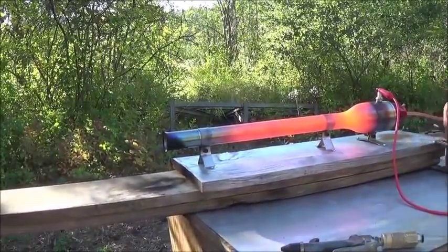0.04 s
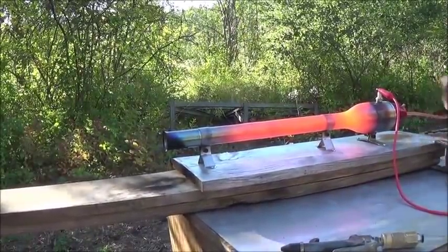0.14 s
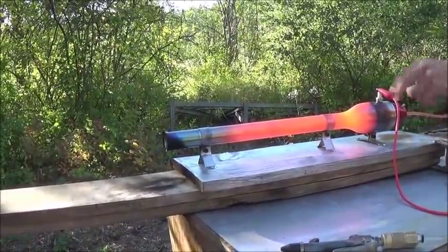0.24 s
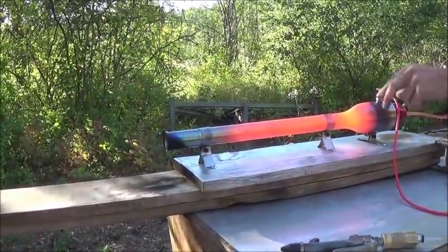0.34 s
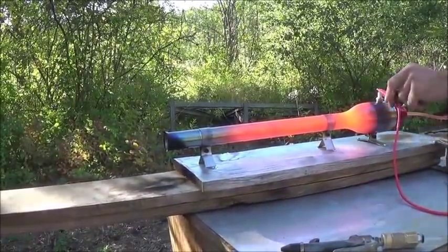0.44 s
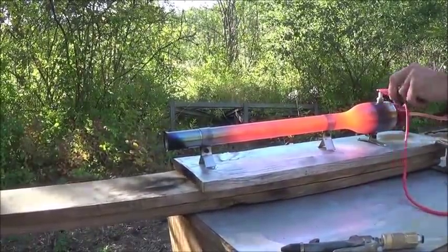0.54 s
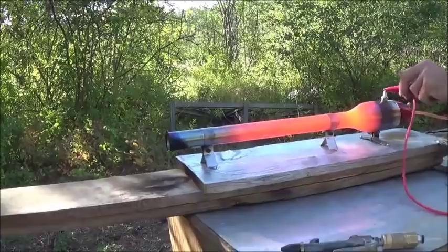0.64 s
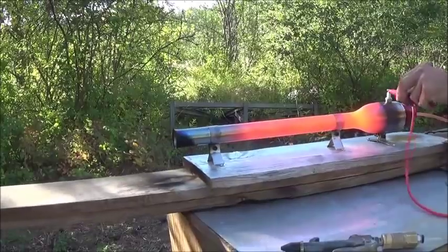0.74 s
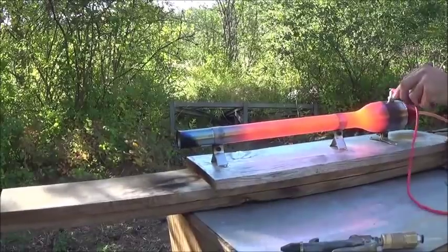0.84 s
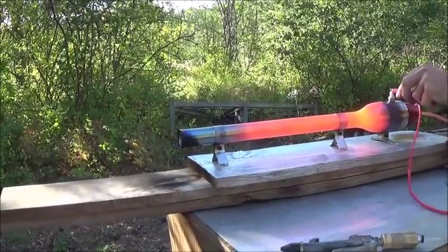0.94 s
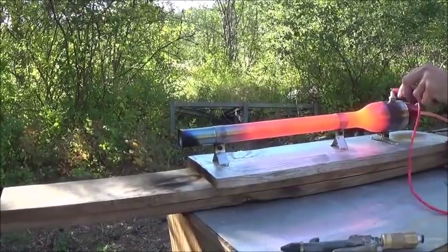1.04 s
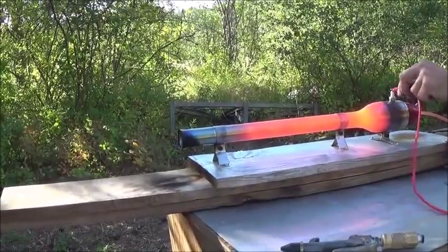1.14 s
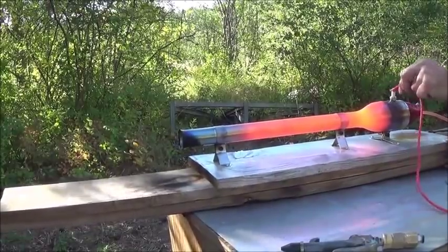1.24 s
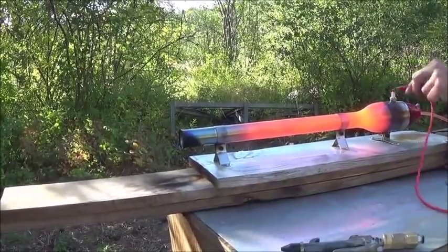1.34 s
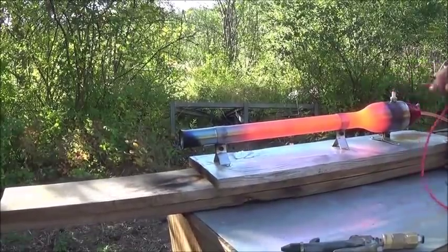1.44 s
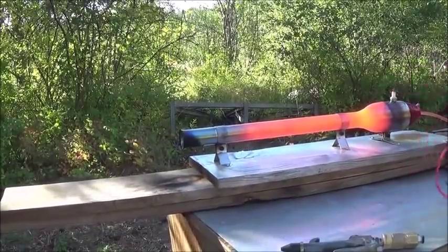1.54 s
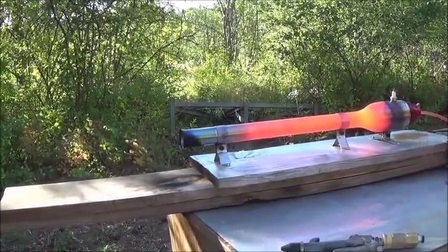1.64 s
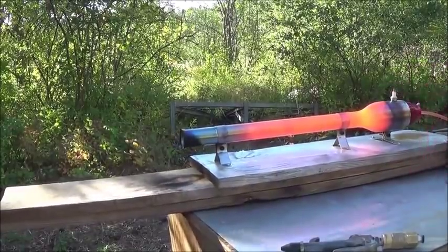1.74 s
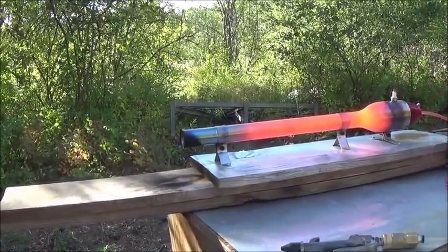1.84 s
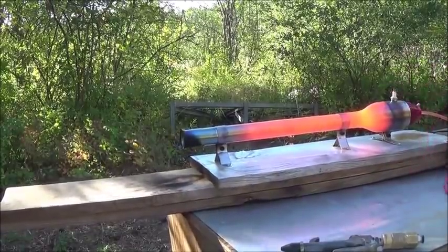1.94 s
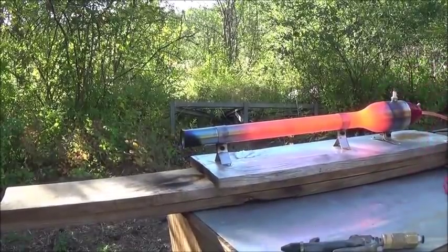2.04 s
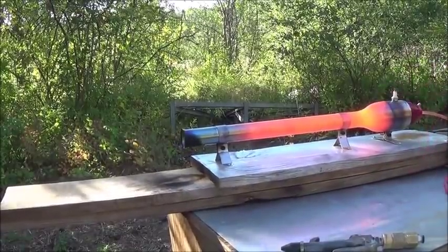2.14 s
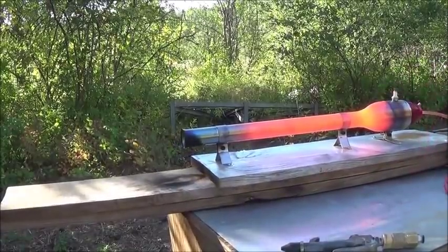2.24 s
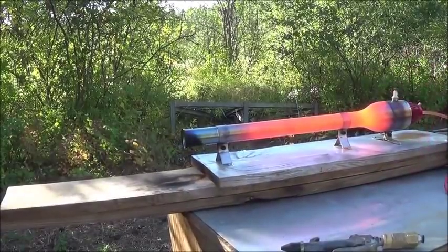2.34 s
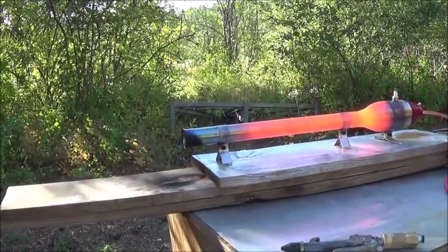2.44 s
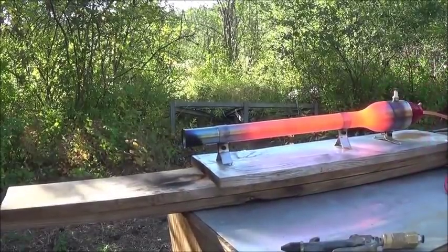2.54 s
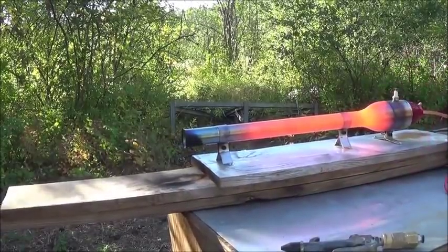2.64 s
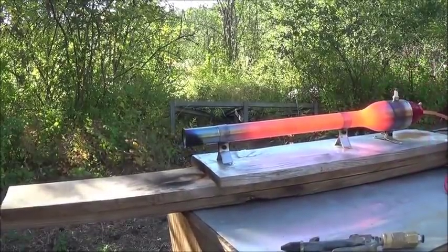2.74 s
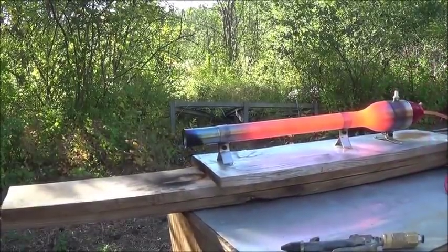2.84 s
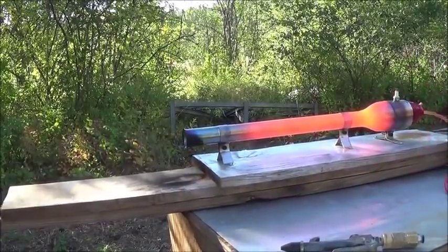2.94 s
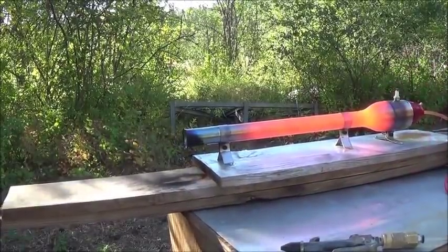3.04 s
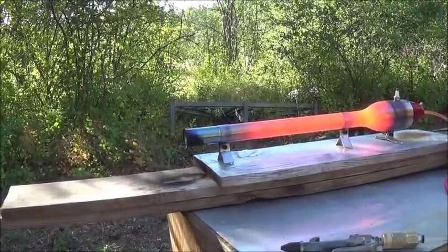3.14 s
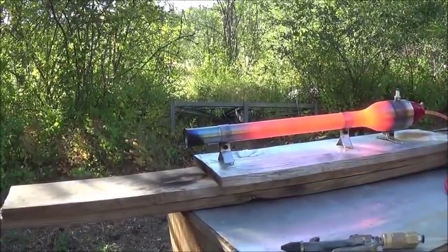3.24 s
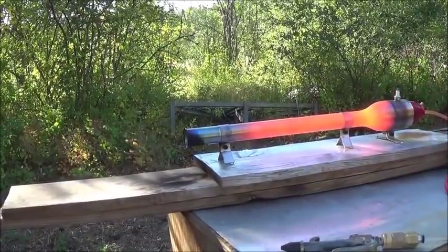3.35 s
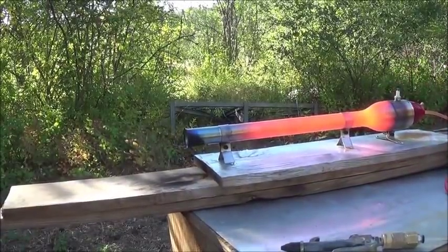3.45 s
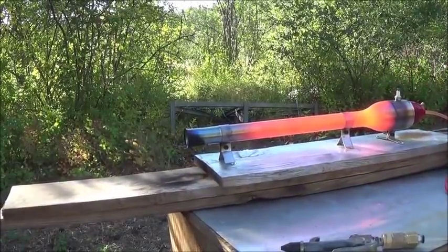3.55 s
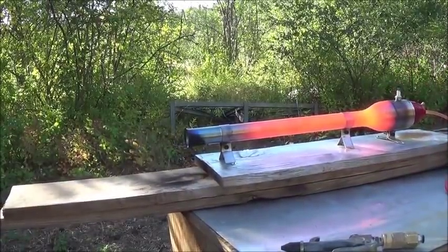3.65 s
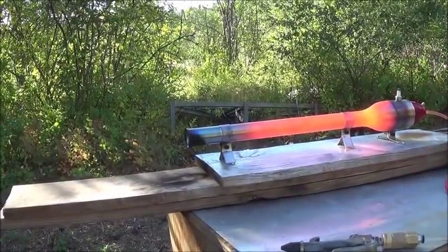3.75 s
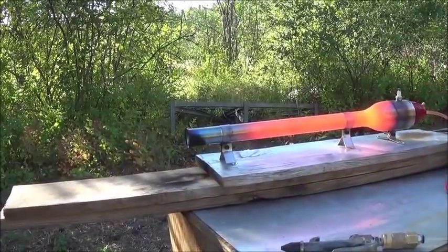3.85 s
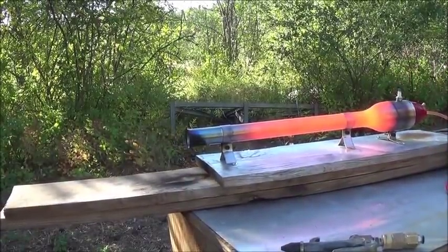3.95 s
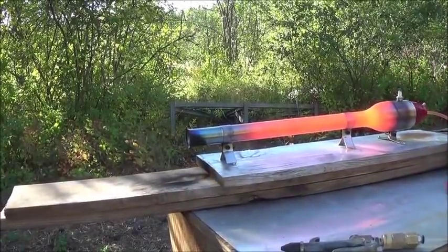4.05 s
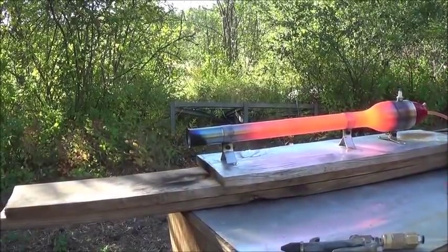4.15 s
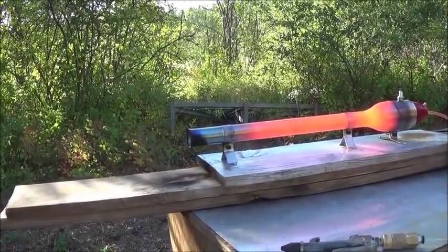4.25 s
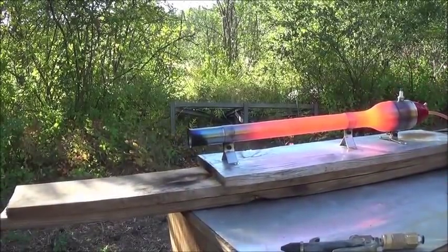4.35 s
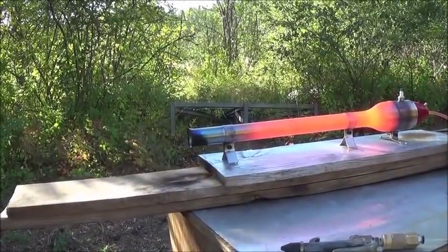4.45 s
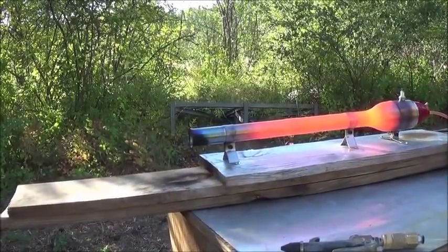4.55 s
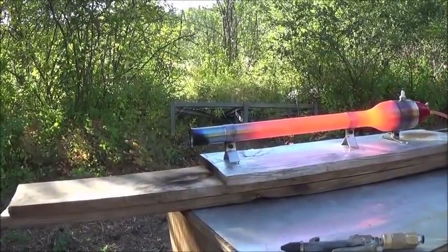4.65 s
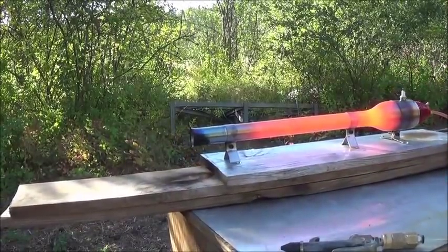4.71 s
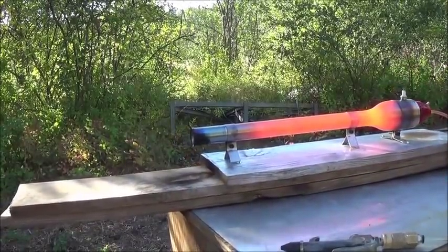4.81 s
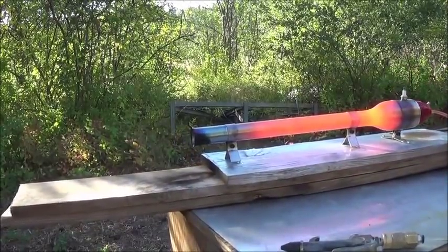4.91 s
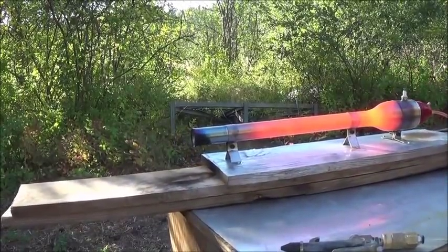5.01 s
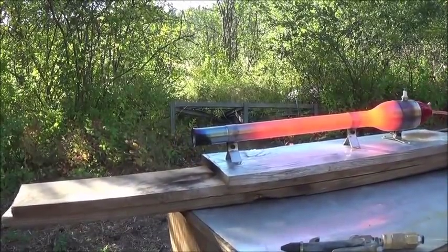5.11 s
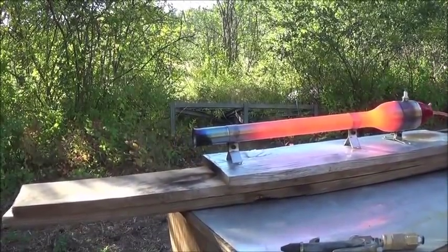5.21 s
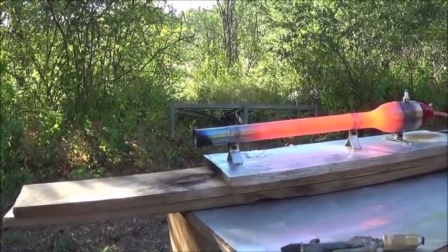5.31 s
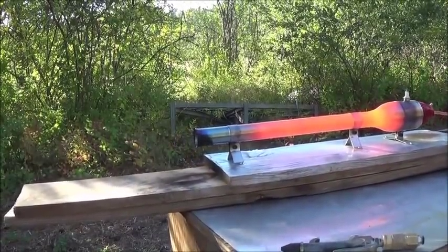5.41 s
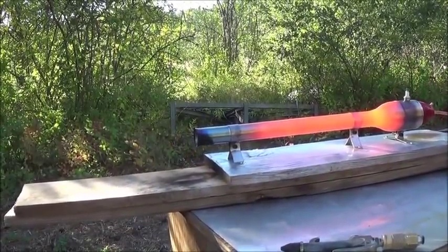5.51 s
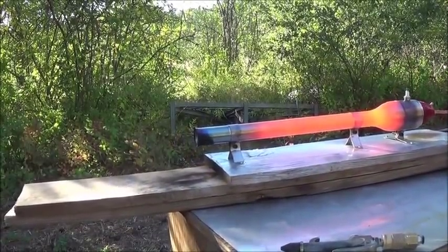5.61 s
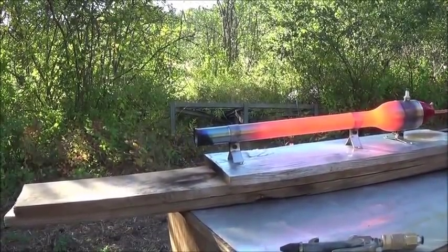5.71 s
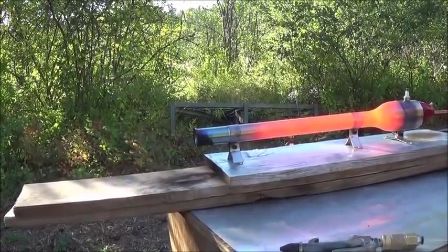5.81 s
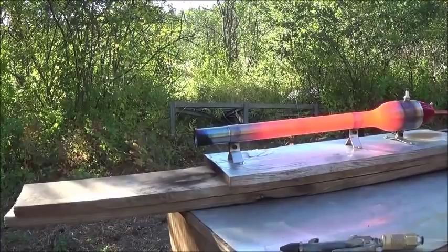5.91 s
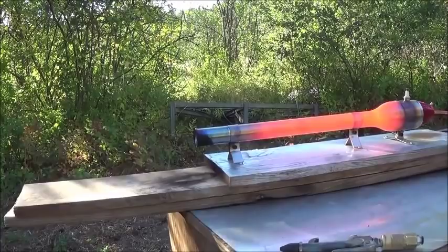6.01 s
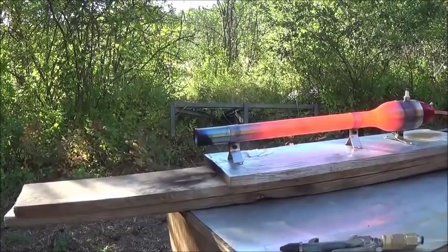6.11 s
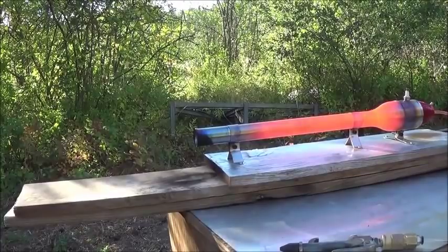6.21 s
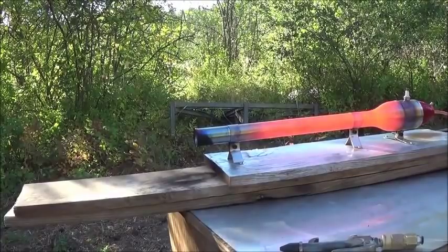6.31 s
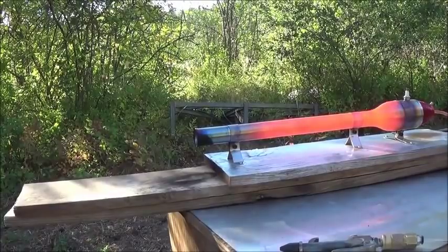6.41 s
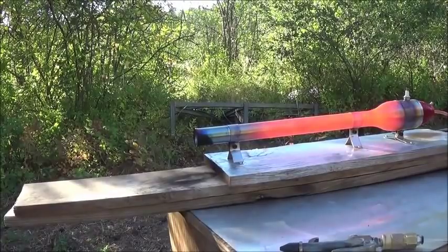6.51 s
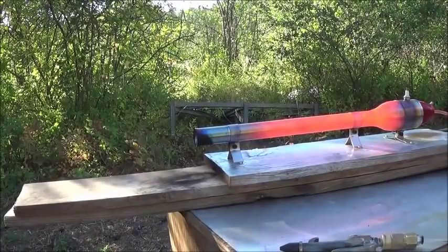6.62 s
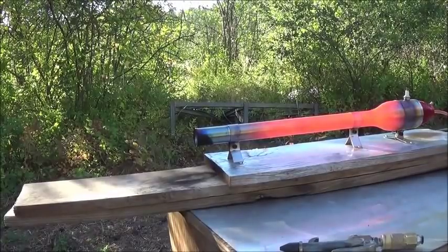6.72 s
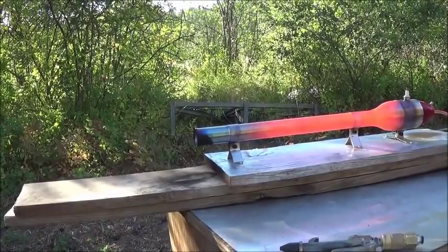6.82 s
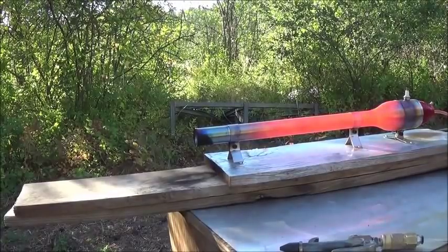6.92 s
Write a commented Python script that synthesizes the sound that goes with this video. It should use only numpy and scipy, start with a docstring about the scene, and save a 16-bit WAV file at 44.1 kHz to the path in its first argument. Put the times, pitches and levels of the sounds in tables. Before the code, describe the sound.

Continuous harsh buzzing roar from a pulse jet, close to a stereo camera microphone in a leafy outdoor spot. The level is squashed and slightly saturated, the tone unsteady and grainy, with wide turbulent gas noise. At about 5.7 seconds the flame goes out abruptly with a dull pop and a short diffuse echo. What remains is a faint, fast knocking pump, slightly right, over soft air hiss, both growing gradually louder.

```python
"""A loud, buzzing roar flames out after about 5.7 s; then a quiet electric pump and outdoor hiss rise into hearing.
The roar is a small pulse jet on a bench outdoors: each firing gives a pressure pulse and bursts of turbulent gas.
The pulse is a sum of wavering tones, the gas is puffed noise, and trees return a short echo made of fading noise.
The pump is a train of knocks and a rattle ringing its casing; the air is soft noise.
A gain control turns the loud jet down and recovers slowly once it has stopped."""
import sys
import numpy as np
from scipy import signal
from scipy.fft import rfft, irfft, next_fast_len
from scipy.io import wavfile
from scipy.ndimage import uniform_filter1d

SR = 44100
rng = np.random.default_rng(int(sys.argv[2]) if len(sys.argv) > 2 else 0)


def file_out(sig):
    """Save sig as 16-bit WAV at sys.argv[1]."""
    # one column per channel
    cols = np.atleast_2d(sig).T
    # limit, then scale
    lim = np.clip(cols, -1, 1)
    pcm = np.round(lim * 32767).astype(np.int16)
    wavfile.write(sys.argv[1], SR, pcm)


N = 307377
T = np.arange(N) / SR  # time in seconds
SIZE = next_fast_len(N + SR)  # a second of spare room, so that filtered sound does not wrap around
HZ = np.maximum(np.fft.rfftfreq(SIZE, 1 / SR), 1)  # frequency of each spectrum bin

# How alike left and right are for the jet's gas and the echo.
# Each row: frequency in Hz, shared part from 0 to 1.
LIKENESS = [(60, .6), (130, .35), (330, .12), (1000, .15), (1500, .65), (2500, .85), (4000, .87),
            (5000, .97), (8000, .996), (13000, .999)]


def undb(db):
    """Turn decibels into a gain."""
    return 10 ** (np.asarray(db) / 20)


def level(x, db):
    """Scale a sound to a chosen rms level in dB."""
    return x * undb(db) / np.sqrt(np.mean(x ** 2))


def over_hz(table, axis=1):
    """Read one column of a table at every frequency, joining the rows over log frequency."""
    rows = np.array(table, float)
    return np.interp(np.log(HZ), np.log(rows[:, 0]), rows[:, axis])


def walk(rate):
    """Random wandering with spread 1: each value is held for 1 / rate seconds, then smoothed twice."""
    hold = int(SR / rate)
    steps = np.repeat(rng.standard_normal(N // hold + 1), hold)
    x = uniform_filter1d(uniform_filter1d(steps, hold), hold)[:N]
    return x / x.std()


def spread(shared, own, alike):
    """Make left and right from two unrelated spectra: one is added to both, one has opposite signs."""
    mid = np.sqrt((1 + alike) / 2) * shared
    side = np.sqrt((1 - alike) / 2) * own
    return irfft(np.array([mid + side, mid - side]), SIZE)[:, :N]


def cycles():
    """Count firings through time: the rate climbs as the pipe heats, and combustion keeps it unsteady."""
    hot_hz, cold_gap_hz, warming_s = 254.5, 3.0, 1.4  # settled rate, shortfall at the start, time constant
    waver_hz = .9 * walk(50) + .25 * walk(4)
    rate_hz = hot_hz - cold_gap_hz * np.exp(-T / warming_s) + waver_hz
    return np.cumsum(rate_hz) / SR


def pulse(turns):
    """Tones near multiples of the firing rate start from a common suction spike; higher ones waver more."""
    # Tones of the pressure pulse. Each row: multiple of the firing rate, relative level in dB,
    # growth in dB per second.
    tones = [(0.9996, -0.5, 0), (1.998, -5, 0.8), (3, -5, 0), (4.014, -6, 0.69), (4.994, 1.5, 0.3),
             (5.98, -29, 0), (6.984, -5, -0.5), (8.03, -15, 0.2), (8.83, -19.5, 1), (10.01, -11, -0.5),
             (11, -14, 1), (12.07, -14, -0.5), (12.95, -9, -1.05), (14.3, -26, 3), (14.8, -18, 2),
             (15.8, -14, -1), (16.73, -21, -2.5), (18.23, -12, -1), (18.75, -15, 1), (21, -21.5, 0),
             (21.93, -14.5, 0), (22.85, -17, 0.5)]
    waver_db = .25  # for the first tone
    total = 0
    for multiple, db, growth in tones:
        tone_db = db + growth * T + waver_db * np.sqrt(multiple) * walk(60)
        total = total - undb(tone_db) * np.cos(2 * np.pi * multiple * turns)
    return level(total, 0)


def ports(x):
    """The pulse arrives straight and via the bench, so each side gets its own phase and level."""
    # How the pulse reaches the microphone pair. Each row: frequency in Hz, lead of the left in radians,
    # left minus right in dB.
    lean_rows = [(60, 0, 0), (254, -.39, -1.2), (508, 1.15, -1.6), (762, 2.8, -4), (1016, 2.8, -8.5),
                 (1270, .24, -2.4), (1780, 0, 0)]
    lean = undb(over_hz(lean_rows, axis=2) / 2) * np.exp(.5j * over_hz(lean_rows))
    return irfft(rfft(x, SIZE) * np.array([lean, 1 / lean]), SIZE)[:, :N]


def gas(turns):
    """Two unrelated spectra of turbulent noise, puffed once a cycle, with a new size per firing and band."""
    # Gas burst in each band. Each row: centre in Hz, start after the pulse in cycles, length in cycles,
    # steady hiss between bursts in dB, scatter between firings in dB.
    bands = [(145, 0.028, 0.82, -10, 3.5), (520, -0.024, 0.72, 1, 2.5), (1446, -0.043, 0.99, 9, 5.5),
             (2810, -0.076, .4, -10, 2), (4730, -0.085, 0.35, -13.5, 1.5), (9300, 0.021, 0.38, -18.5, 1.67),
             (13500, 0.037, 0.41, -21, 2.5)]
    # Tone colour of the exhaust gas. Each row: frequency in Hz, relative level in dB per Hz.
    exhaust = [(20, -36), (60, -28.5), (150, -16.5), (260, -4.5), (600, -3), (1000, -1), (2800, -4),
               (3300, -1), (3900, -4.5), (4550, -2), (7400, -9.5), (10200, -2), (12500, -8.5),
               (14500, -19.5)]
    rise = 0.088  # cycles
    centres = np.log([row[0] for row in bands])
    out = 0
    for b, (_, start, length, between_db, scatter_db) in enumerate(bands):
        since = (turns - start) % 1  # cycles since this burst began
        firing = (turns - start + 1).astype(int)
        size = undb(scatter_db * rng.standard_normal(N // 100))[firing]
        shape = np.minimum(since / rise, 1) * np.exp(-(since / length) ** 3)
        puff = level(shape * size + undb(between_db), 0)
        # neighbouring bands cross over with constant total power
        share = np.sqrt(np.interp(np.log(HZ), centres, np.arange(len(bands)) == b))
        out = out + share * rfft(puff * rng.standard_normal((2, N)), SIZE)
    return out * undb(over_hz(exhaust))


def trees(sound):
    """Trees send back a short echo: the sound is smeared by fading noise and coloured."""
    t60_s, echo_db, first_return_s = .36, -13, .008  # echo level is set before the colouring
    t = T[:SR // 2]
    echo = rng.standard_normal((2, len(t))) * undb(-60 * t / t60_s) * (t > first_return_s)
    echo *= undb(echo_db) / np.sqrt(np.sum(echo ** 2, axis=1, keepdims=True))
    # twigs are too thin to return bass, leaves scatter the treble
    colour = HZ / (HZ + 600j) / (1 + (HZ / 5500) ** 3)
    back = rfft(sound, SIZE) * rfft(echo, SIZE) * colour
    return spread(*back, over_hz(LIKENESS))


def last_pop():
    """The last firing is a strong low thump that leaves the pipe and bench ringing as fading sine tones."""
    # Brief rings as the flame dies. Each row: start in seconds, frequency in Hz,
    # level in dB before rise and fade, rise time constant in seconds, time to fade by 60 dB in seconds.
    rings = [(5.693, 255, -6, .006, .05), (5.699, 960, -15, .003, .05), (5.719, 765, -23, .008, .1),
             (5.75, 1010, -34, .006, .12)]
    out = 0
    for start_s, hz, db, rise_s, t60_s in rings:
        t = np.maximum(T - start_s, 0)
        strength = undb(db - 60 * t / t60_s) * (1 - np.exp(-t / rise_s))
        out = out + strength * np.sin(2 * np.pi * hz * t)
    return out


def jet():
    """Pressure pulses and gas share the same firings until the flame dies; the trees echo both."""
    # How the flame goes out. Each row: time in seconds, change of the pulse in dB, change of the gas in dB.
    flame_out = [(5.66, 0, -2.5), (5.68, -3, -1.5), (5.694, -6, -2.5), (5.706, 3, -22), (5.713, -30, -33),
                 (5.73, -60, -69)]
    s, pulse_db, gas_db = np.transpose(flame_out)
    turns = cycles()
    tone = ports(undb(-18.0 + np.interp(T, s, pulse_db)) * pulse(turns)) + last_pop()
    steady_roar = level(spread(*gas(turns), over_hz(LIKENESS)), -12.5)
    roar = steady_roar * undb(np.interp(T, s, gas_db))
    toward_trees = np.mean(roar + undb(-2.5) * tone, axis=0)
    return tone + roar + trees(toward_trees)


def pump():
    """Two knocks a stroke ring the casing and shake a loose rattle; it stands off to the right."""
    # Ringing modes of the pump casing. Each row: frequency in Hz, width of each of two equal filters in Hz,
    # relative level in dB, rattle added to the knocks in dB.
    modes = [(100, 30, -33, -51), (221, 120, -26, -53), (363, 51, -17.5, -57), (502, 92, -3, -44),
             (870, 99, -4, -34.5), (1025, 42, -7, -32), (1245, 38, -12.5, -31), (1630, 220, -10.5, -32),
             (2220, 150, -4, -45.5), (2470, 190, -12, -43), (2970, 39.8, -15, -45), (3530, 300, -23, -38),
             (4385, 70, -21, -44), (6430, 1000, -28.5, -40)]
    stroke_hz, first_knock_s, second_knock_s = 50.39, .0105, .0195
    count = (stroke_hz * T).astype(int)
    # knock strength varies at random and alternates from stroke to stroke
    strength = undb(.7 * rng.standard_normal(N) + 0.5 * (-1) ** count)
    knocks = rfft(np.diff(count, prepend=0) * strength, SIZE)
    # a sharp knock rings the high modes, then a dull one the low modes
    delay_s = np.where(HZ > 1900, first_knock_s, second_knock_s)
    knocks *= np.exp(-2j * np.pi * HZ * delay_s)
    swell = 1 + 0.6 * np.cos(2 * np.pi * stroke_hz * (T - second_knock_s))
    rattle = rfft(rng.standard_normal(N) * swell, SIZE)
    case = 0
    for hz, width, db, rattle_db in modes:
        ring = 1 / (1 + 1j * (HZ / hz - hz / HZ) * hz / width) ** 2
        case = case + undb(db) * (knocks + undb(rattle_db) * rattle) * ring
    return level(irfft(case, SIZE)[:N], -49.0) * undb([[-2.5], [2.3]])  # left, right


def air():
    """Soft outdoor hiss: coloured noise, largely shared by both sides and louder on the right."""
    # Tone colour of the hiss. Each row: frequency in Hz, relative level in dB per Hz.
    hiss_colour = [(25, -49), (150, -32), (300, -22), (500, -10), (900, -9), (2200, -4), (2800, -8),
                   (4500, -17), (7000, -18), (10000, -25.5), (15600, -41)]
    hiss = rfft(rng.standard_normal((2, N)), SIZE) * undb(over_hz(hiss_colour))
    return level(spread(*hiss, 0.77), -53) * undb([[-2.2], [1.8]])  # left, right


def scene():
    """The jet over pump and air."""
    return jet() + pump() + air()


def record(dry):
    """Gain control holds loud sound at one level and recovers slowly; peaks round off; the top is cut."""
    recovery_db_s, target_db, top_hz = 10.5, -12.0, 15750
    power = uniform_filter1d(np.mean(dry ** 2, axis=0), int(.08 * SR))
    heard_db = 10 * np.log10(power + 1e-12)
    # follow every rise, but fall no faster than the recovery
    held_db = np.maximum.accumulate(heard_db + recovery_db_s * T) - recovery_db_s * T
    loud = dry * undb(target_db - uniform_filter1d(held_db, int(0.0197 * SR)))
    rounded = loud / (1 + np.abs(loud) ** 4) ** .25
    top_cut = signal.ellip(12, .2, 80, top_hz, fs=SR, output="sos")
    return signal.sosfilt(top_cut, rounded)


dry = scene()
out = record(dry)
file_out(out)
```